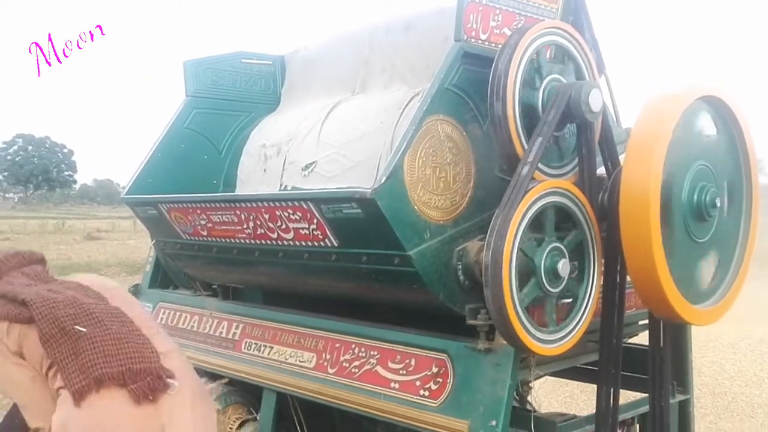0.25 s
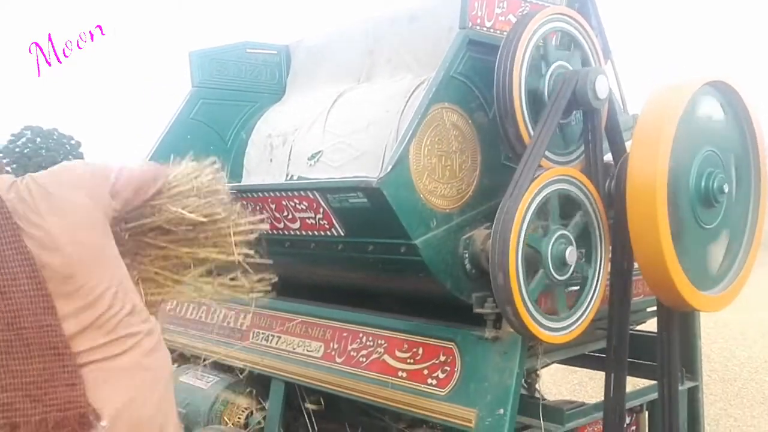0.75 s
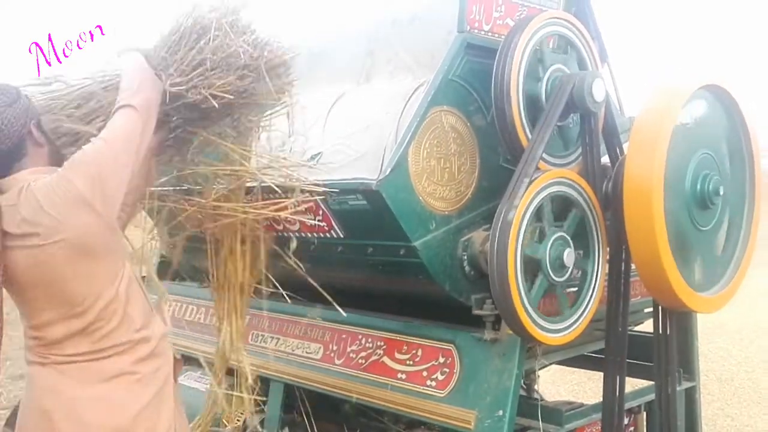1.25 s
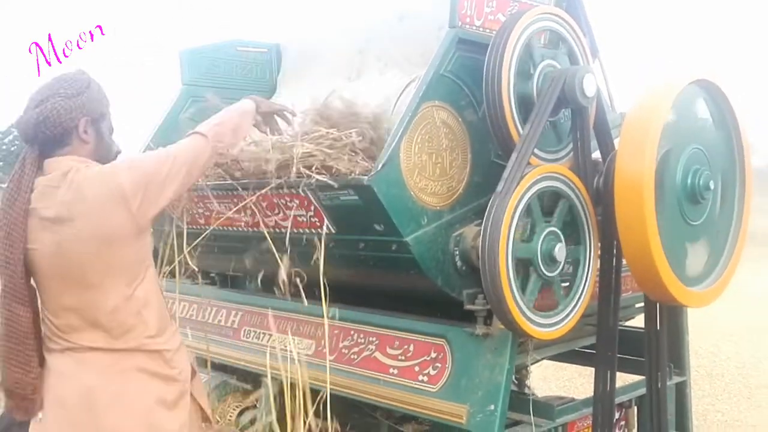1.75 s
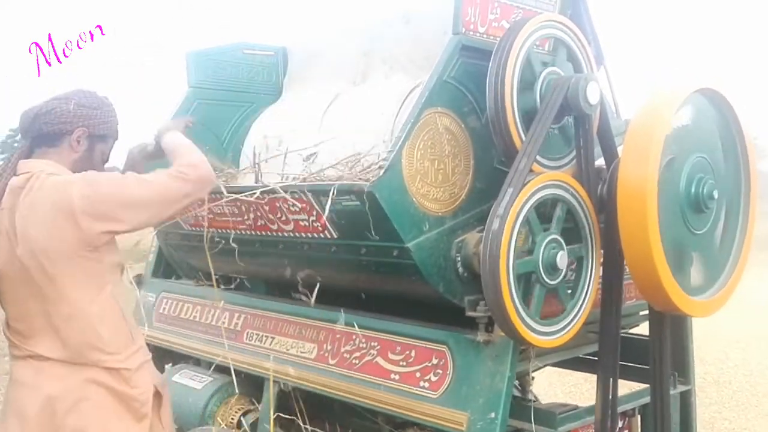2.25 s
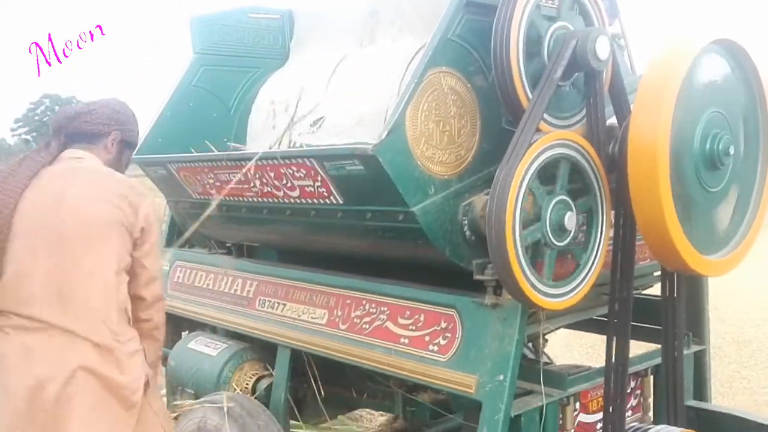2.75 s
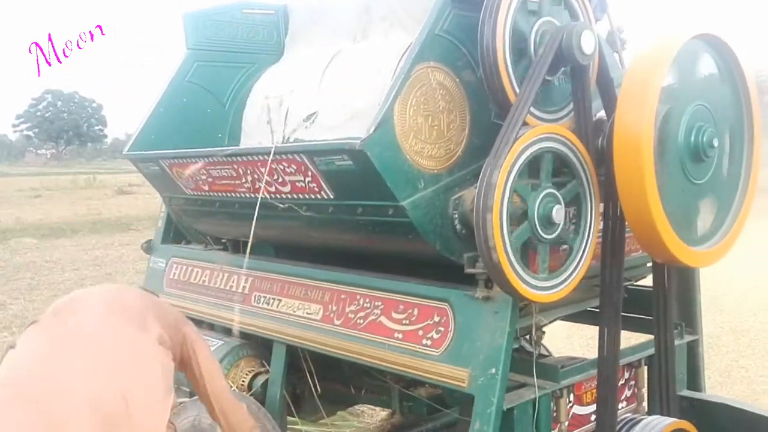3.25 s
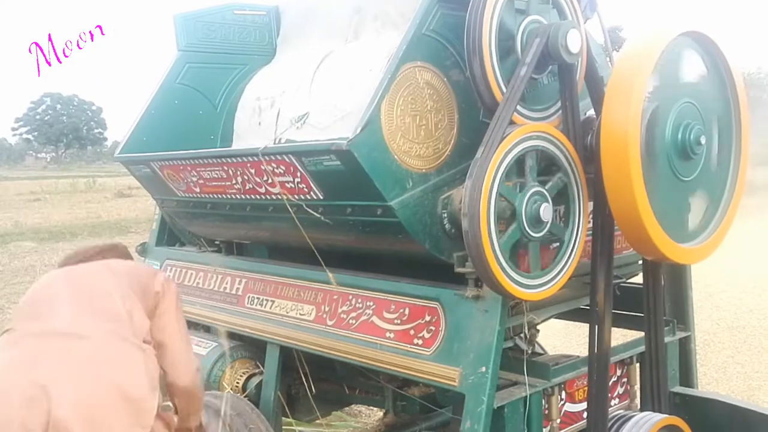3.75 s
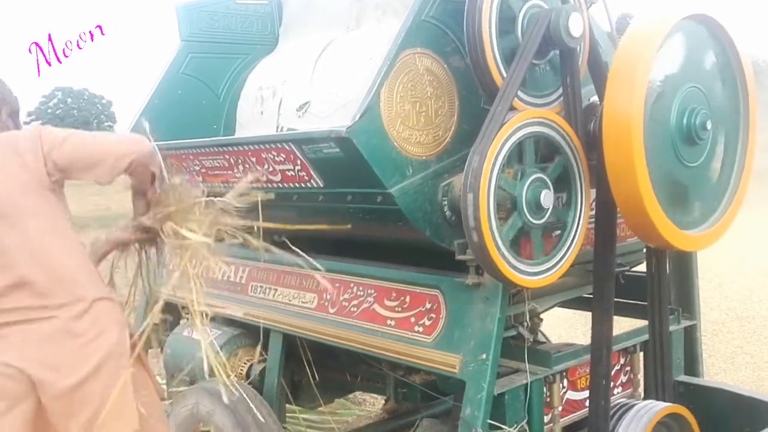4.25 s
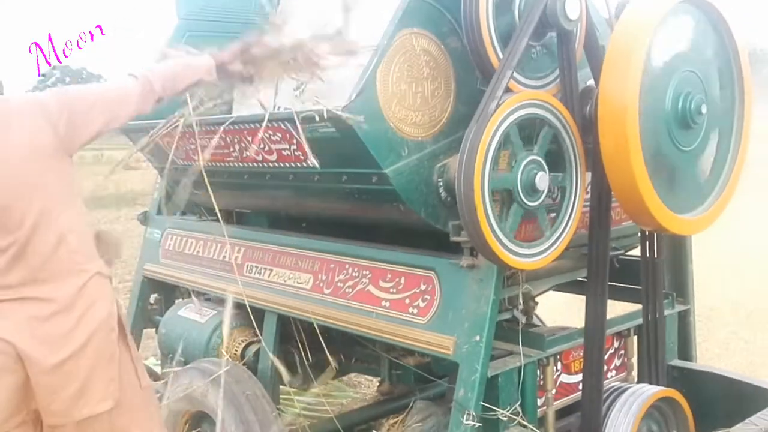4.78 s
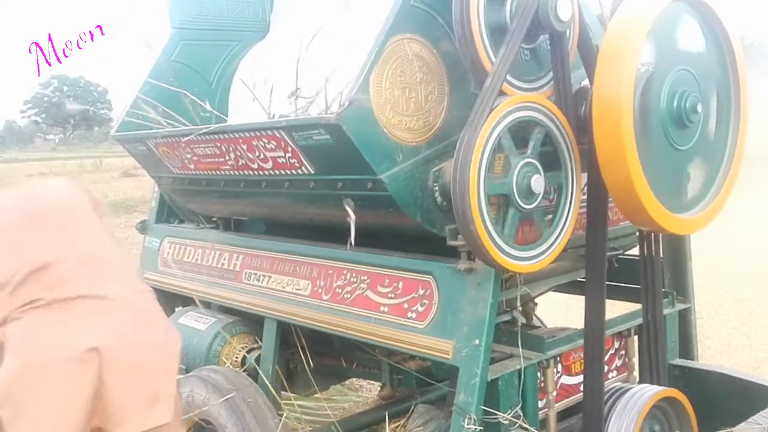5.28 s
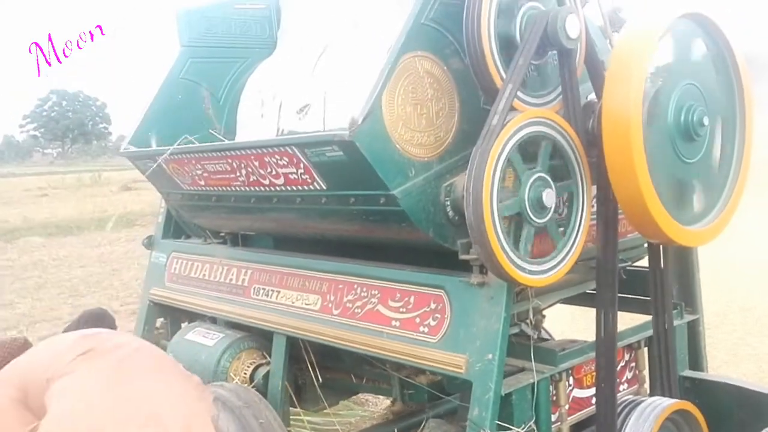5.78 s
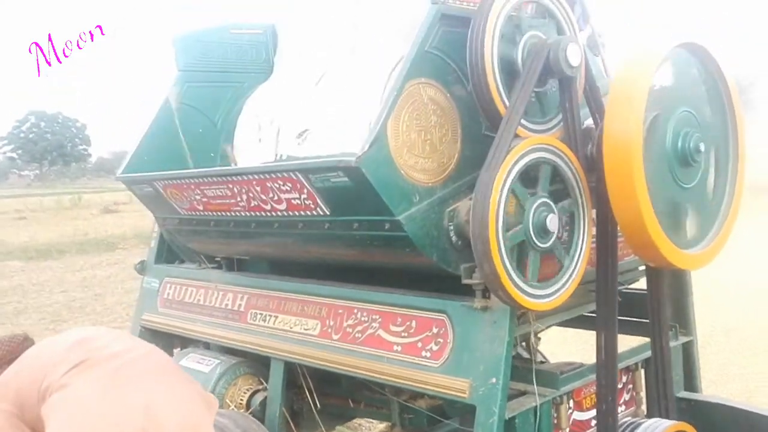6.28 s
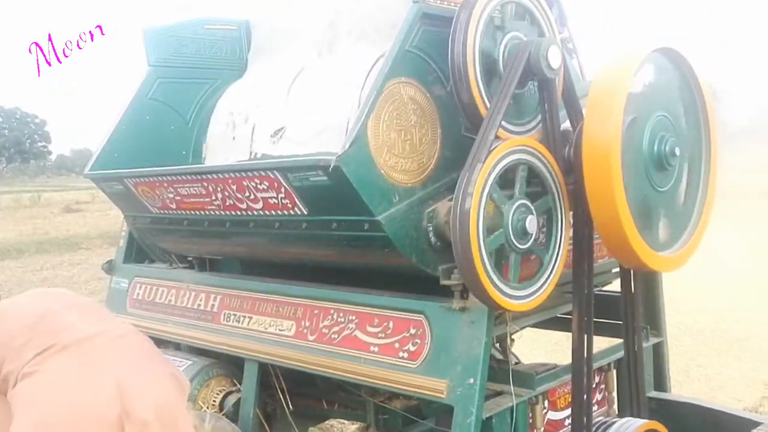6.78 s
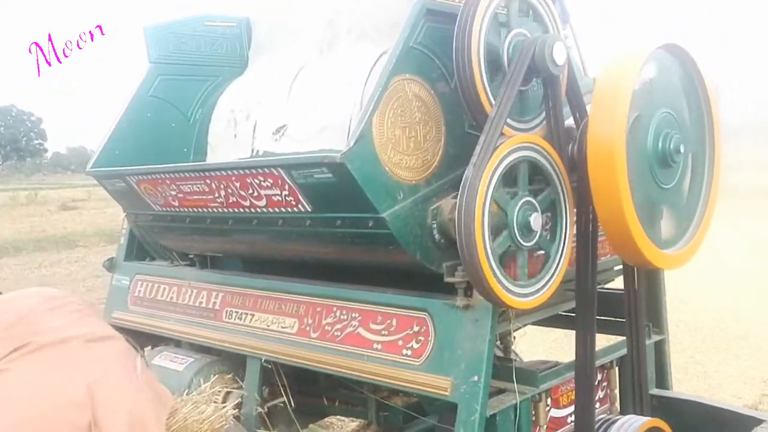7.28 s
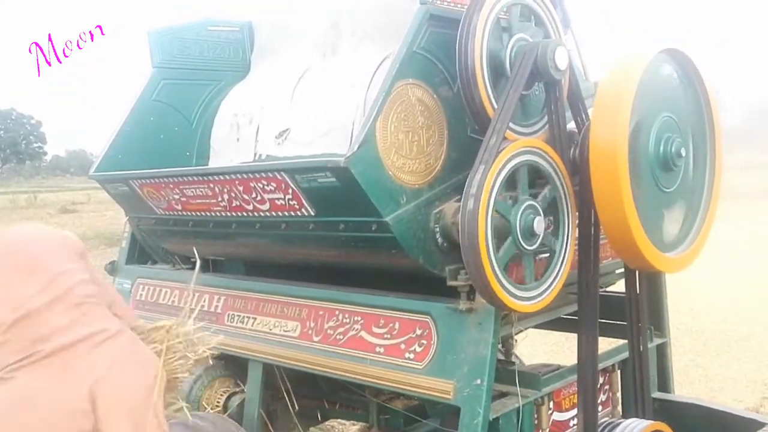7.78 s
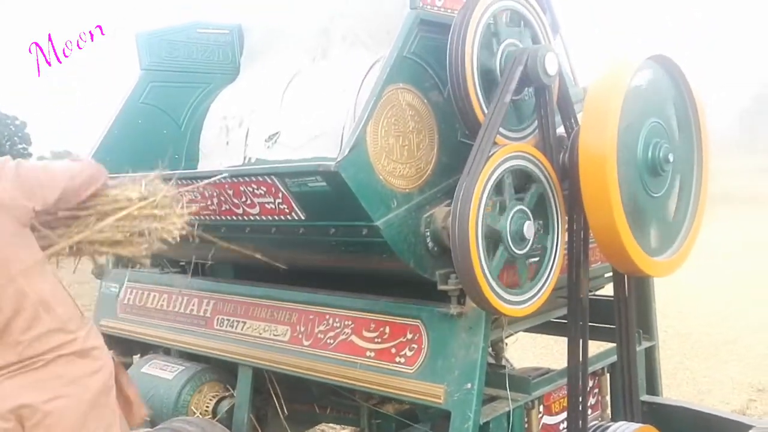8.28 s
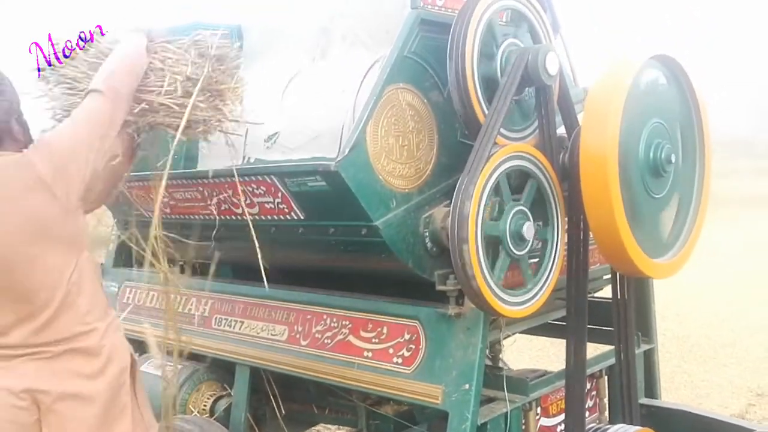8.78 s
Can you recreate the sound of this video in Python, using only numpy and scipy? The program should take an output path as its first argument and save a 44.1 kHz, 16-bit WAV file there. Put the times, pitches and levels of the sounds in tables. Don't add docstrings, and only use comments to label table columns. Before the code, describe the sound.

Close, continuous threshing machine noise: bright gritty hiss of husks and grain leaning right, low blower throb, knocking diesel, the drive sagging under load.

```python
import sys
import numpy as np
from scipy import signal
from scipy.fft import rfft, irfft, next_fast_len
from scipy.io import wavfile
from scipy.ndimage import uniform_filter1d

SR = 44100
rng = np.random.default_rng(int(sys.argv[2]) if len(sys.argv) > 2 else 0)


def bounce(signal):
    frames = np.transpose(np.atleast_2d(signal))
    limited = np.clip(frames, -1, 1)
    pcm = np.round(limited * 32767).astype(np.int16)
    wavfile.write(sys.argv[1], SR, pcm)


def decibels_to_gain(level_db):
    exponent = np.asarray(level_db, float) / 20
    return 10 ** exponent


N = 398218

SIZE = 8 * next_fast_len(N // 8 + 1)
HZ = np.maximum(np.arange(SIZE // 2 + 1) * SR / SIZE, 1)
CYCLE = 0.2089


def on_time(table):
    s, *columns = np.transpose(table)
    return [np.interp(np.arange(N) / SR, s, column) for column in columns]


def on_hz(table):
    hz, value = np.transpose(table)
    return np.interp(np.log(HZ), np.log(hz), value)


def unit(x):
    return x / np.sqrt(np.mean(x ** 2))


def walk(rate, step=1):
    smoothing = max(int(SR / 100 / rate), 1)
    values = uniform_filter1d(rng.standard_normal(N // 100 + 2), smoothing)
    values = unit(uniform_filter1d(values, 3))
    return np.interp(np.arange(0, N, step) / 100, np.arange(len(values)), values)


def ports(left, right, lag_s):
    late = left * np.exp(-2j * np.pi * HZ * lag_s)
    return irfft(np.array([late, right]), SIZE)[:, :N]


def firing(turns, fade):
    return np.exp(-(3 * CYCLE * turns % 1) / fade)


def tones(turns, speed, orders, levels, wander, flicker_db):
    out = 0
    turns, speed = turns[::8], speed[::8]
    for order, (db, slope_db, bend_db) in zip(orders, levels):
        phase = 2 * np.pi * order * turns
        phase = phase + wander * np.sqrt(order) * walk(4, 8) + rng.uniform(0, 2 * np.pi)
        sway_db = slope_db * speed + bend_db * speed ** 2 + flicker_db * walk(5, 8)
        out = out + decibels_to_gain(db + sway_db) * np.sin(phase)
    spectrum = 8 * np.sqrt(2) * rfft(out, SIZE // 8)
    return np.pad(spectrum, (0, len(HZ) - len(spectrum)))


def chaff(turns, hiss_db, pan_db):
    # (time [s], peak level [dB])
    timed_puffs = [(0.2124, -11), (1.4107, -8), (2.5301, -30), (2.6015, -11), (3.7609, -25), (3.7918, -15),
                   (3.935, -5), (4.0342, -7), (4.1674, -7), (4.3809, -25), (4.4593, -6), (4.5366, -6),
                   (4.9462, -7), (5.0599, -16), (5.1477, -23), (5.2425, -8), (5.7414, -8), (5.9125, -33),
                   (5.9728, -10), (6.3235, -8), (6.7067, -22), (6.786, -7), (7.1013, -9), (7.3432, -23),
                   (7.6425, -29), (8.0012, -10), (8.2282, -8), (8.3534, -21), (8.6502, -14), (8.9725, -14)]
    # (frequency [Hz], spectral density [dB per Hz])
    left_colour = [(1700, -14), (3000, -16), (4300, -13.5), (5500, -14), (7000, -12.3), (9000, -12.3),
                   (11000, -10.3), (13000, -12), (14300, -12.3)]
    # (frequency [Hz], spectral density [dB per Hz])
    right_colour = [(1500, -22), (3000, -13), (4300, -9), (5400, -7), (6000, -3), (7100, 0), (8500, -1.2),
                    (10300, .3), (11200, -1.5), (12200, -6), (13200, -9), (14300, -10.5)]
    s, peak_db = np.transpose(timed_puffs)
    starts = np.zeros(N)
    starts[(s * SR).astype(int)] = decibels_to_gain(peak_db - 18.5)
    thin = rng.integers(0, N, size=30)
    thin_db, spread_db = -25, 3
    starts[thin] += decibels_to_gain(thin_db - 9 + spread_db * rng.standard_normal(len(thin)))

    t = np.arange(6000) / SR
    puff = (t / 0.0062) ** 2 * np.exp(2 - 2 * t / 0.0055)
    tail_db, tail_s = -10, 0.022
    puff = puff + decibels_to_gain(tail_db) * np.minimum(t / 0.0044, 1) * np.exp(-t / tail_s)

    sieve_jolt = uniform_filter1d(firing(turns, fade=0.12), 100)
    shake_db = 0.73 * sieve_jolt + 0.22 * walk(33) + 0.54 * walk(45)
    flow = decibels_to_gain(hiss_db + shake_db) + signal.fftconvolve(starts, puff)[:N]
    bright_db = 0.29 * (uniform_filter1d(hiss_db, 20000) - np.mean(hiss_db))
    top_share = 1 / (1 + (9000 / HZ) ** 8)
    out = []
    for colour in left_colour, right_colour:
        ticks = rng.standard_normal(N) * decibels_to_gain(1.9 * np.minimum(rng.exponential(size=N), 4))
        spectrum = rfft(unit(ticks) * flow, SIZE) * decibels_to_gain(on_hz(colour))
        body, top = irfft([spectrum * (1 - top_share), spectrum * top_share], SIZE)[:, :N]
        body = decibels_to_gain(0.45 * walk(24) - bright_db) * body
        top = decibels_to_gain(0.92 * walk(25) + bright_db) * top
        out.append(body + top)
    left, right = out
    return decibels_to_gain(6.0) * np.array([left * decibels_to_gain(pan_db + 7.5), right])


def blower(turns, speed, blade_db):
    rotor_orders = [.8, 1.6, 2, 3, 3.2, 3.92, 4, 4.8, 5, 11.595, 12, 13.35, 15, 15.45]
    # (level [dB], slope [dB per % of speed], bend [dB per % squared])
    rotor_levels = [(-60, .2, .1), (-61, 0, -.1), (-43.5, .3, -.1), (-43, -1, -.6), (-55, -1.6, .3),
                    (-50.5, .3, -.1), (-44, -.5, .3), (-56, -.5, .5), (-52.5, -.8, -.7), (-50, 2.8, .1),
                    (-49, -1.5, -.1), (-54.5, .4, -.2), (-52.5, .3, -1), (-55, -2, .3)]
    beater_orders = [6, 9, 12, 13, 14, 15, 16, 18, 20, 21, 23, 24]
    # (level [dB], slope [dB per % of speed], bend [dB per % squared])
    beater_levels = [(-49, 1.4, 1.2), (-50.5, 0.3, -0.8), (-65, 4.3, 0.67), (-46, -5, -1.04),
                     (-45, -4, -0.67), (-55.5, -0.5, 0), (-57, -1.5, 0.29), (-54, -1.5, 0), (-46, -3, -0.8),
                     (-68, -1.5, 0.8), (-50, 1, 0.063), (-46.5, -3, -0.51)]
    beater_ratio = 0.618
    throb = np.sqrt(2) * decibels_to_gain(blade_db + 0.4 * walk(4.2)) * np.sin(2 * np.pi * turns)
    hum = tones(turns, speed, rotor_orders, rotor_levels, wander=0.1, flicker_db=1.0)
    beats = tones(beater_ratio * turns, speed, beater_orders, beater_levels, wander=0.05, flicker_db=1.2)
    return throb + ports(decibels_to_gain(0.5) * hum, hum, 3e-5) + ports(decibels_to_gain(-5.5) * beats, beats, 1e-4)


def engine(turns, speed, knock_db):
    cycle_orders = [3, 6, 8, 9, 11, 12, 13, 15, 16, 19, 21, 32, 34, 80]
    # (level [dB], slope [dB per % of speed], bend [dB per % squared])
    cycle_levels = [(-53.5, 0.1, 0.0), (-49, -0.3, 0.11), (-57, 0.2, -0.4), (-47.5, 0.6, -0.19),
                    (-57, -1.2, -0.58), (-45.5, -0.01, -0.084), (-60, 0.21, 0.1), (-44.5, 0.2, -0.8),
                    (-52.5, 0.15, -0.52), (-46.5, -0.19, -0.046), (-54, -0.0, -0.2), (-41, 2.3, -0.84),
                    (-68, 1.5, 0.32), (-49, -1.2, -0.7)]
    # (frequency [Hz], spectral density [dB per Hz])
    knock_colour = [(800, -14), (1300, 1), (1700, -6), (2050, 1), (2500, -2), (2850, -6), (3250, -4),
                    (3650, -2), (4100, -8), (5500, -20)]
    hum = tones(CYCLE * turns, speed, cycle_orders, cycle_levels, wander=0.055, flicker_db=1.1)
    uneven_db = 1.3 * np.sin(2 * np.pi * CYCLE * turns) + 1.94 * walk(35)
    jolts = 0.63 + uniform_filter1d(firing(turns, fade=0.24), 120)
    gate = jolts * decibels_to_gain(knock_db + uneven_db)
    knock = rfft(gate * rng.standard_normal(N), SIZE) * decibels_to_gain(on_hz(knock_colour))
    hum_pair = ports(decibels_to_gain(2.0) * hum, hum, 0.000081)
    knock_pair = ports(decibels_to_gain(-1.0) * knock, knock, 0.000442)
    return hum_pair + decibels_to_gain(11) * knock_pair


def housing(roar_db):
    # (frequency [Hz], spectral density [dB per Hz])
    roar_colour = [(20, -24), (45, -13), (95, -11), (140, -7), (190, -2), (270, -2.5), (320, -2), (380, -5),
                   (520, -1), (720, 0.04), (1000, -6), (1500, -7), (2400, -12), (5000, -22)]
    # (frequency [Hz], width [Hz], gain [dB])
    panels = [(245, 20, 3), (425, 45, 5), (500, 30, 2), (690, 30, 2.5), (750, 32, 5.5), (915, 28, 4),
              (1040, 35, 3), (1130, 90, -3.5), (1230, 60, 1.5), (1520, 100, 2.5)]
    # (frequency [Hz], likeness [0-1])
    likeness = [(60, .998), (250, .96), (500, .83), (900, .56), (1300, .3), (2000, .1), (6000, .02)]
    colour = decibels_to_gain(on_hz(roar_colour))
    for hz, width_hz, db in panels:
        colour = colour * (1 + (decibels_to_gain(db) - 1) / (1 + (2 * (HZ - hz) / width_hz) ** 2))
    like = np.clip(on_hz(likeness), 0, 1)
    noise = rfft(rng.standard_normal((2, SIZE)))
    mid, side = noise * np.sqrt([1 + like, 1 - like]) * colour
    left = decibels_to_gain(1.4) * (mid + side) * np.exp(-2j * np.pi * HZ * 1.2e-4)
    pair = np.array([left, mid - side])
    out = 0
    for hz in 31 * 2 ** np.arange(9):
        band = np.cos(np.pi / 2 * np.clip(np.log2(HZ / hz), -1, 1)) ** 2
        flicker = decibels_to_gain(0.5 * walk(8))
        out = out + flicker * irfft(band * pair, SIZE)[:, :N]
    return unit(out) * decibels_to_gain(roar_db + 1.5)


def scene():
    # (time [s], blade rate [Hz])
    drive = [(0.0, 62.56), (0.3, 62.65), (0.9, 63.2), (1.5, 63.7), (2.1, 64.41), (2.4, 64.65), (2.7, 64.7),
             (3.0, 63.98), (3.3, 63.07), (3.9, 61.96), (4.3, 61.45), (4.8, 61.25), (6.0, 62.11),
             (6.6, 62.3), (7.2, 62.78), (8.4, 64.28), (8.7, 64.51), (9.03, 64.64)]
    # (time [s], level [dB])
    feed = [(0.0, -27.5), (1.4, -28.5), (2.0, -29.5), (2.3, -28), (2.7, -26), (3.4, -26.5), (3.8, -25.5),
            (4.1, -24), (4.3, -25.5), (4.6, -23), (4.95, -26), (5.3, -25), (5.62, -28), (5.8, -25),
            (6.25, -26.5), (7.1, -26.5), (7.8, -27.5), (9.03, -28)]
    usual_hz, blades = 63, 5
    blade_hz = uniform_filter1d(*on_time(drive), 9000)
    turns = np.cumsum(blade_hz) / SR
    speed = 100 * (blade_hz / usual_hz - 1)
    blade_db = -38 - 1.45 * speed - 0.08 * speed ** 2
    stream_db, = on_time(feed)
    load_db = uniform_filter1d(stream_db - np.mean(stream_db), 20000)
    drum_db = 0.3 * np.sin(2 * np.pi * turns / blades)
    roar_db = -31.5 + 0.33 * load_db - 0.42 * walk(2.04) + drum_db
    knock_db = -37 + 0.1 * load_db + 0.25 * walk(1.96)
    hiss_db = stream_db + 5 + 0.3 * walk(12)
    pan_db = -9 - 0.27 * load_db
    machine = blower(turns, speed, blade_db) + engine(turns, speed, knock_db) + housing(roar_db)
    return chaff(turns, hiss_db, pan_db) + machine


def roll_off(x):
    return signal.sosfilt(signal.butter(12, 15580, fs=SR, output="sos"), x)


def record(dry):
    mix = irfft(rfft(dry, SIZE) * (HZ < 14250), SIZE)[:, :N]
    return roll_off(mix)


dry = scene()
out = record(dry)
bounce(out)
```